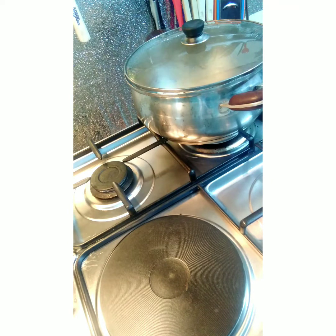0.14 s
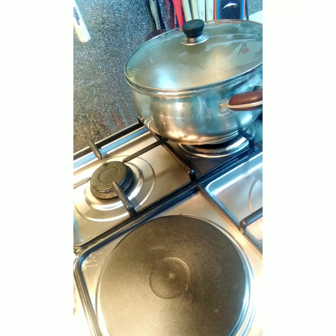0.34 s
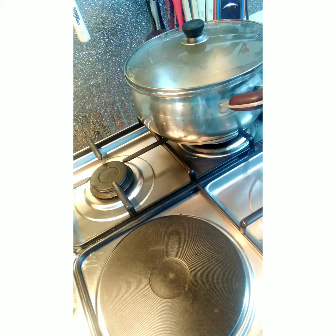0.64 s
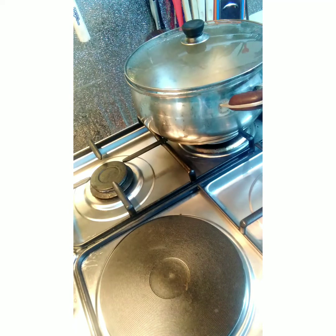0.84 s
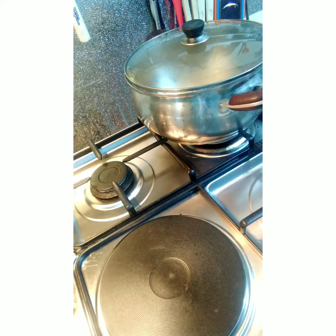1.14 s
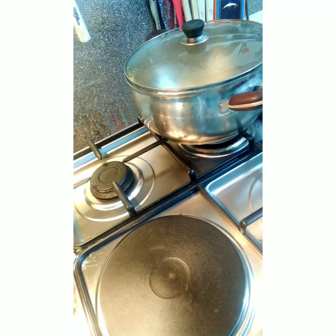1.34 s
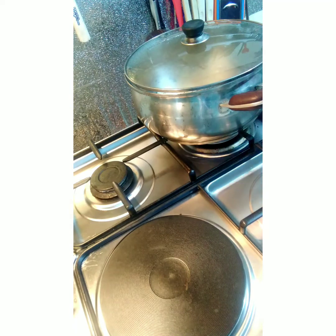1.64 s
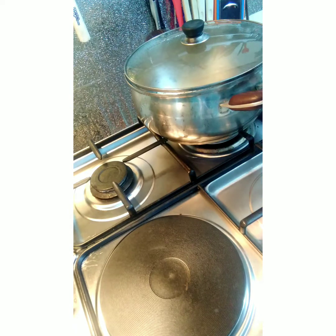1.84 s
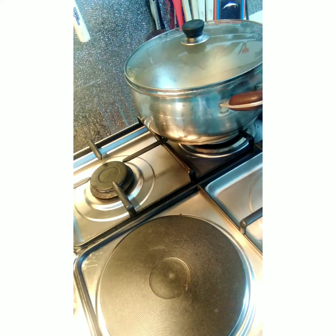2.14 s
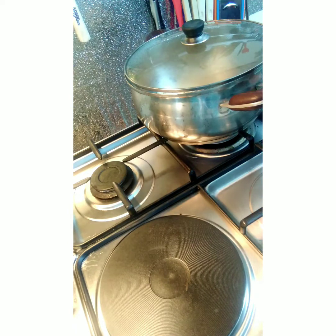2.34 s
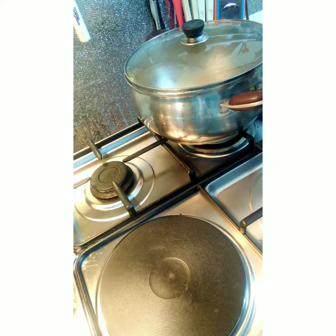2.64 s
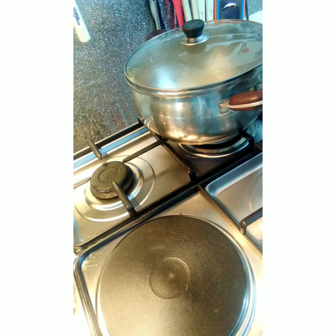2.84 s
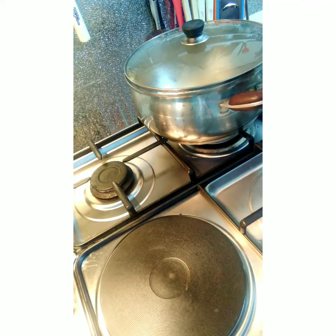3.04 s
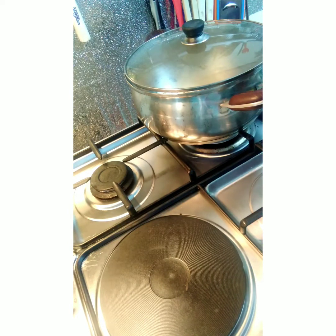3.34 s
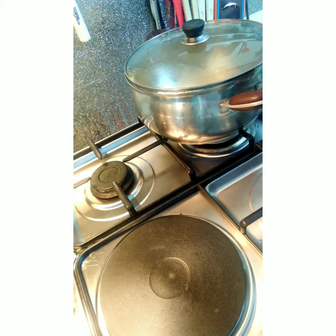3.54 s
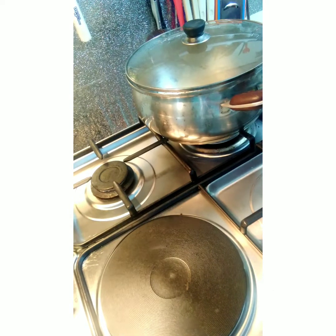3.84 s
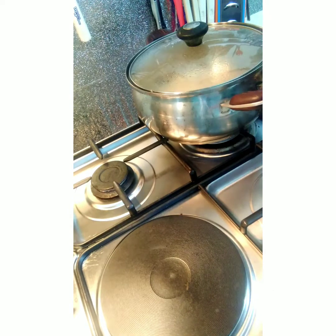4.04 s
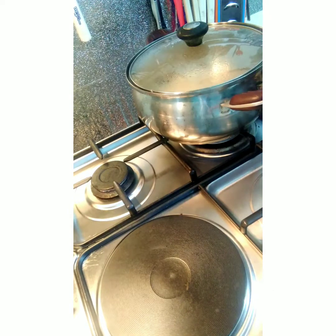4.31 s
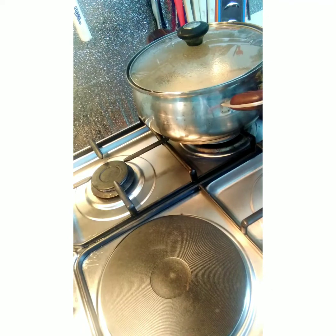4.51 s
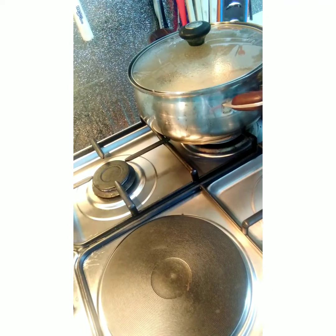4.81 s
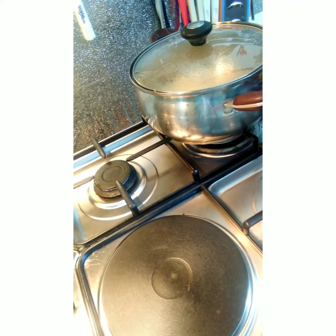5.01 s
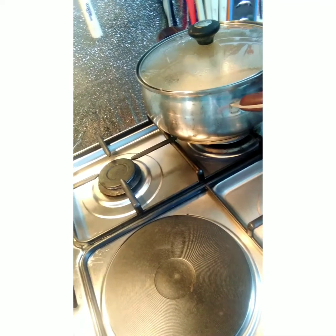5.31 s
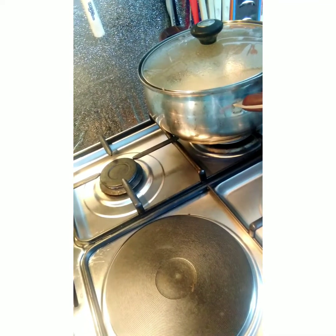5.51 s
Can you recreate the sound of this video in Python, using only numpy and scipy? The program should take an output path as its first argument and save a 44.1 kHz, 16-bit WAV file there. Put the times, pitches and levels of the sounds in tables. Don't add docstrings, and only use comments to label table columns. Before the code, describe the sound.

Popcorn kernels pop and ping in a covered metal pot in scattered bursts, then after a short silence a low hum and hiss with more pops.

```python
import sys
import numpy as np
from scipy import signal
from scipy.fft import rfft, irfft, next_fast_len
from scipy.io import wavfile
from scipy.ndimage import uniform_filter1d

SR = 44100
rng = np.random.default_rng(int(sys.argv[2]) if len(sys.argv) > 2 else 0)


def volts_from_db(level):
    exponent = np.asarray(level, float) / 20
    return 10 ** exponent


def wav_record(signal):
    frames = np.transpose(np.atleast_2d(signal))
    bounded = np.clip(frames, -1, 1)
    quanta = np.round(bounded * 32767).astype(np.int16)
    wavfile.write(sys.argv[1], SR, quanta)


N = 249833
CHANGE_S, RESUME_S = 3.809, 4.134
LEAD_S = 0.01
TOP_DB_PER_DB = 0.15


def pot():
    out = np.zeros((2, N))
    f = np.fft.rfftfreq(16384, 1 / SR)
    comb_db = 3.8 * np.interp(f, 70 * np.arange(400), rng.standard_normal(400))
    early_pops(out, comb_db)
    late_pops(out, comb_db)
    bell(out[0])
    light_taps(out[0])
    return out


def early_pops(out, comb_db):
    # (time [s], shimmer 5.5-10 kHz [dB], thud [dB], wall 0.8-2.5 kHz [dB])
    pops = [(0.0613, -7, -33, -27.5), (0.0672, -12.5, -40, -26), (0.0824, -26, -37.5, -29.5),
            (0.2374, -19, -49, -33), (0.2504, -22.5, -43, -30), (0.3107, -10, -50, -29),
            (0.3154, -25, -49, -32), (2.1884, -26, -56, -41), (2.2244, -36, -60, -45),
            (2.3012, -34.5, -58, -45), (2.349, -36, -60, -49), (2.385, -5, -27, -20.5),
            (2.4094, -25, -39.5, -26), (2.6748, -25, -68, -42), (2.7222, -3.5, -55, -33),
            (2.7644, -41, -46, -30), (2.8075, -24, -62, -46), (2.8863, -33.5, -64, -47),
            (2.948, -33, -56, -51), (2.9781, -15, -33, -31), (3.0094, -54, -45, -32),
            (3.5174, -28, -41, -36), (3.5344, -27.5, -49, -40), (3.5684, -39.5, -54.5, -37)]
    # (time [s], shimmer [dB], thud [dB], wall [dB])
    lid_hits = [
        (.3586, -6.5, -60, -53),
        (.3674, -13, -60, -55),
    ]
    # (frequency [Hz], level [dB], t60 [s])
    wall_modes = [(980, -8, 0.11), (1550, -4.5, 0.15), (1672, -7, 0.17), (2002, -6, 0.17), (2396, -9, 0.19),
                  (2665, -4.5, 0.3), (2842, -17.5, 0.35), (3176, -9.5, 0.21), (3278, -6.5, 0.2),
                  (3763, -2.5, 0.2), (4307, -4, 0.39), (4770, -8.5, 0.26), (5300, -9.5, 0.063),
                  (4800, -13, 0.084), (5900, -12.5, 0.44), (6000, -1, 0.57), (6430, -4.5, 0.13),
                  (6220, 1, 0.13), (7450, -16.5, 0.38), (7310, -6, 0.12), (7400, -9, 0.25),
                  (8250, -2.5, 0.2), (8070, -8, 0.27), (8900, -9, 0.2), (8950, -11.5, 0.3), (8376, 0, 0.31),
                  (8160, -6.5, 0.36), (8650, -9, 0.11)]
    lid_t60_s = 0.15
    for s, *levels_db in pops:
        top_db = -12 + TOP_DB_PER_DB * min(levels_db[0] + 15, 0)
        add(out, kernel(*blow(*levels_db), wall_modes, top_db, comb_db), s - LEAD_S)
    for s, *levels_db in lid_hits:
        bands_db = blow(*levels_db)[:4]
        add(out, kernel(*bands_db, lid_t60_s, wall_modes, -13, comb_db), s - LEAD_S)


def late_pops(out, comb_db):
    # (time [s], shimmer [dB], wall [dB], stove-top boom [dB])
    late_kernels = [
        (5.138, -30.5, -60, -62),
        (5.252, -21.5, -37, -30.5),
        (5.2884, -14, -31, -24),
        (5.3951, -31, -42, -28),
        (5.4141, -17, -33, -26.5),
        (5.455, -38, -43, -40),
    ]
    # (frequency [Hz], level [dB], t60 [s])
    late_modes = [(991, -11, 0.18), (2056, -17, 0.16), (2229, -20, 0.2), (3849.8, 0, 0.044),
                  (4312, -21, 0.17), (4915, -21, 0.17), (5265, -18, 0.3), (5819, -17, 0.13)]
    thud_re_wall_db = -9
    for s, shimmer_db, wall_db, boom_db in late_kernels:
        bands = blow(shimmer_db, wall_db + thud_re_wall_db, wall_db)
        top_db = -1 + 1.5 * TOP_DB_PER_DB * (shimmer_db + 13)
        add(out, kernel(*bands, late_modes, top_db, comb_db), s - LEAD_S)
        boom(out[0], s, boom_db)


def blow(shimmer_db, thud_db, wall_db):
    crack_db = wall_db + 0.3 * (shimmer_db - wall_db) - 2
    t60_s = 0.195 - 0.0027 * (max(shimmer_db, wall_db) + 5)
    return shimmer_db, thud_db, wall_db, crack_db, t60_s


def kernel(shimmer_db, thud_db, wall_db, crack_db, t60_s, modes, top_db, comb_db):
    # (frequency [Hz], level [dB per Hz])
    steel = [(40, -44.5), (120, -8), (290, -4), (400, -22), (700, -20), (1300, -25), (1800, -15.5),
             (3400, -10), (5500, -6.5), (8320, 0), (9800, -9.5), (12500, -19), (16000, -32)]
    # (frequency [Hz], t60 [s])
    ring_times = [(100, .25), (600, .25), (2000, .25), (5000, .22), (8500, .24), (12000, .2)]
    lead_share, lead_fade_s = 0.33, 0.0019
    room_t60_s, room_db = 0.55, -26
    size = 2 * (len(comb_db) - 1)
    t, f = np.arange(size) / SR - LEAD_S, np.fft.rfftfreq(size, 1 / SR)
    length = t60_s / 0.23
    on = t > 0
    lead = np.exp(np.minimum(t, 0) / lead_fade_s)
    t = np.maximum(t, 0)
    zones = [(150, thud_db + 18), (400, thud_db + 23), (900, wall_db + 12), (2200, wall_db + 16),
             (3000, crack_db + 8), (4600, crack_db + 10.5), (6200, shimmer_db - 5.5),
             (9000, shimmer_db - 6), (13000, shimmer_db + top_db)]

    rise = np.where(on, 1 - (1 - lead_share) * np.exp(-t / 0.0012), lead_share * lead)
    jitter = np.repeat(rng.uniform(-1.5, 1.44, size // 32), 32)
    rattle = volts_from_db(5.0 * (1 - np.exp(-t / 0.003)) * np.exp(-t / 0.027) * jitter)

    place_db = 2.2 * np.interp(f, 330 * np.arange(80), rng.standard_normal(80))
    noise = rfft(rng.standard_normal((2, size))) * volts_from_db(comb_db + place_db)
    direct = 0.93 * np.exp(-t / 0.008) + 0.4 * np.exp(-t / 0.00067)
    room = volts_from_db(room_db) * 1000.0 ** (-t / room_t60_s)
    out = np.zeros((2, size))
    for hz in 64 * 2 ** np.arange(0, 8.1, 0.5):
        band = np.clip(1 - np.abs(2 * np.log2(np.maximum(f, 1) / hz)), 0, 1)
        band_t60_s = read(ring_times, hz) * length
        tail = np.exp(-np.log(1000) * t / band_t60_s) + direct + room
        out += irfft(noise * band, size) * tail
    colour_db = read(steel, f) + read(zones, f)
    out = irfft(rfft(out * rise * rattle) * volts_from_db(colour_db), size)
    out[1] *= volts_from_db(-10)

    onset = on * rattle * (1 - np.exp(-t / 0.001))
    spot = rng.standard_normal((len(modes), 2))
    for (hz, db, mode_t60_s), (a, b) in zip(modes, spot):
        gain = volts_from_db(db + read(zones, hz) + 3.5 * a - 20.5)
        out[0] += gain * onset * ring(t, hz, min(mode_t60_s, 0.24) * length, phase=np.pi * b)
    out[0] += volts_from_db(thud_db + 1.5) * on * rise * ring(t, 275, 0.07)
    return out * np.clip((t[-1] - t) / 0.08, 0, 1)


def boom(out, s, db):
    t = np.arange(SR // 4) / SR
    add(out, volts_from_db(db + 2.5) * ring(t, 161, 0.115) * (1 - np.exp(-t / 0.004)), s)


def bell(out):
    # (time [s], level [dB])
    strikes = [(.082, -36), (.25, -38), (.275, -41), (.312, -41), (.335, -38.5), (2.765, -42), (5.252, -40),
               (5.287, -36), (5.33, -44), (5.422, -39), (5.455, -44)]
    for s, db in strikes:
        tap(out, s, 972 if s < CHANGE_S else 1005, db, t60_s=0.14, spread_hz=5)


def light_taps(out):
    # (time [s], frequency [Hz], level [dB], spread [Hz])
    pings = [(0.015, 8500, -55.5, 450), (.5, 2990, -53, 400), (2.065, 1620, -41, 170),
             (2.065, 2600, -49, 120), (2.065, 4400, -54, 580), (2.063, 8250, -49.5, 500),
             (2.611, 10500, -56, 2500), (3.005, 707, -37.5, 90), (3.04, 3017, -40.5, 6.8),
             (3.569, 3020, -32, 17), (3.569, 3380, -29, 234), (3.6, 280, -46, 8.3), (3.695, 8600, -57, 150),
             (5.295, 2120, -38.5, 97), (5.416, 2206, -44, 61), (5.555, 6000, -52, 600)]
    for s, hz, db, spread_hz in pings:
        tap(out, s, hz, db, 0.21, spread_hz)


def tap(out, s, hz, db, t60_s, spread_hz):
    t = np.arange(SR // 4) / SR
    a, b = rng.uniform(-1, 1, (2, 30, 1))
    cluster = np.sin(2 * np.pi * (hz + spread_hz * a) * t + np.pi * b).sum(axis=0)
    cluster = cluster * np.exp(-np.log(1000) * t / t60_s)
    add(out, volts_from_db(db + 1.5) * cluster / np.abs(cluster).max() * (1 - np.exp(-t / 0.0016)), s)


def fridge():
    early = np.arange(N) / SR < CHANGE_S
    phase = 2 * np.pi * np.cumsum(np.where(early, 120.3, 118.8)) / SR
    size = np.where(early, volts_from_db(-66), volts_from_db(-44) * settle())
    return size * volts_from_db(3 + 1.5 * walk(18)) * np.sin(phase + 0.15 * walk(15))


def early_air():
    # (frequency [Hz], width [Hz], level [dB])
    peaks = [(237, 25, -5), (603, 66, 0), (1180, 46, -15), (1780, 230, -13), (2140, 58, -16),
             (2420, 97, -18), (2620, 25, -22), (2900, 88, -24), (3230, 49, -28), (3680, 53, -28),
             (4310, 64, -17), (4610, 80, -30), (5050, 49, -29), (5300, 39, -33), (7180, 60, -27),
             (8420, 120, -33), (756, 50, -6), (335, 30, -7.5)]
    # (frequency [Hz], level [dB per Hz])
    bed = [(94, -50.5), (160, -20), (224, -3.5), (402, -14.5), (603, -1.5), (956, -22.5), (1410, -26),
           (1750, -17.5), (3740, -35), (3940, -38), (4300, -20.5), (4790, -38), (7320, -37), (11000, -49.5),
           (14300, -82), (22000, -120)]
    kitchen = air(peaks, bed, db=-57, bed_db=-5, flicker_db=3.4, patch_db=3.0)
    return kitchen + rumble(-80.5, 130, 53) + rumble(-85, 45, 17)


def late_air():
    # (frequency [Hz], width [Hz], level [dB])
    peaks = [(614, 40, 0), (996, 35, -8), (1720, 200, -13), (2370, 63, -17), (3250, 310, -25),
             (4280, 89, -22), (6200, 72, -19), (6730, 41, -23), (6990, 130, -20)]
    # (frequency [Hz], level [dB per Hz])
    bed = [(110, -42), (190, -1.5), (520, -12), (700, -9), (1200, -13), (2600, -26.5), (3200, -37.5),
           (5300, -38), (6800, -39.5), (7500, -18.5), (8700, -15.5), (9000, -24.5), (9500, -29),
           (9750, -48.5), (12000, -53), (22000, -86.5)]
    flame = air(peaks, bed, db=-55, bed_db=2.14, flicker_db=0.84, patch_db=4.5) * volts_from_db(-3.5)
    return (flame + rumble(-56, 121.3, 32.7)) * settle() + rumble(-72, 55, 25)


def air(peaks, bed, db, bed_db, flicker_db, patch_db):
    out = level(hiss(lambda f: volts_from_db(read(bed, f))), bed_db)
    top = 0
    for hz, width_hz, peak_db in peaks:
        band = hiss(lambda f: (1 + (0.98 * (f - hz) / width_hz) ** 2) ** -1.5)
        top = top + band * volts_from_db(peak_db + flicker_db * walk(9))
    return volts_from_db(db) * patchy(out + level(top, -2.5), patch_db)


def rumble(db, hz, width_hz):
    return level(hiss(lambda f: 1 / (1 + ((f - hz) / width_hz) ** 4)), db)


def patchy(x, db):
    f, t, z = signal.stft(x, SR, nperseg=1024)
    field = rng.standard_normal((len(f) // 5 + 1, len(t) // 6 + 1))
    field = np.kron(field, np.ones((5, 6)))[:len(f), :len(t)]
    depth_db = db * np.clip(np.minimum(f / 3000, (9500 - f) / 3000), 0.3, 1)[:, None]
    gain = volts_from_db(depth_db * uniform_filter1d(field, size=3, axis=1))
    return signal.istft(z * gain, SR, nperseg=1024)[1][:N]


def side_patches(side):
    f, t, z = signal.stft(side, SR, nperseg=1024)
    draw = rng.random((len(f) // 24 + 1, len(t) // 5 + 1))
    draw = np.kron(draw, np.ones((24, 5)))[:len(f), :len(t)]
    share = np.interp(f, [3900, 4100, 9000, 10000], [0, 0.2, 0.2, 0.75])
    return signal.istft(z * (draw < share[:, None]), SR, nperseg=1024)[1][:N]


def settle():
    return volts_from_db(-8 * np.exp(-np.maximum(np.arange(N) / SR - RESUME_S, 0) / 0.12))


def hiss(gain):
    size = next_fast_len(N)
    return irfft(rfft(rng.standard_normal(size)) * gain(np.fft.rfftfreq(size, 1 / SR)), size)[:N]


def ring(t, hz, t60_s, phase=0):
    return np.sin(2 * np.pi * hz * t + phase) * np.exp(-np.log(1000) * t / t60_s)


def walk(rate_hz):
    k = int(SR / rate_hz)
    steps = np.repeat(rng.standard_normal(N // k + 1), k)
    return 1.3 * uniform_filter1d(uniform_filter1d(steps, k), k)[:N]


def level(x, db):
    return x * volts_from_db(db) / np.sqrt(np.mean(x ** 2))


def read(table, hz):
    f, v = np.transpose(table)
    return np.interp(np.log(np.maximum(hz, 1)), np.log(f), v)


def add(out, x, s):
    i = int(s * SR)
    out[..., i:i + x.shape[-1]] += x[..., :out.shape[-1] - i]


def scene():
    t = np.arange(N) / SR
    mid, side = pot()
    side = side_patches(side)
    mid = mid + fridge() + np.where(t < CHANGE_S, early_air(), late_air())
    return np.array([mid + side, mid - side]) * ((t < CHANGE_S) | (t > RESUME_S))


def low_pass(x):
    return signal.sosfilt(signal.butter(12, 16320, fs=SR, output="sos"), x)


def record(dry):
    lowpass = signal.ellip(8, 0.2, 60, 15750, fs=SR, output="sos")
    mix = signal.sosfilt(lowpass, dry)
    return low_pass(mix)


dry = scene()
out = record(dry)
wav_record(out)
```